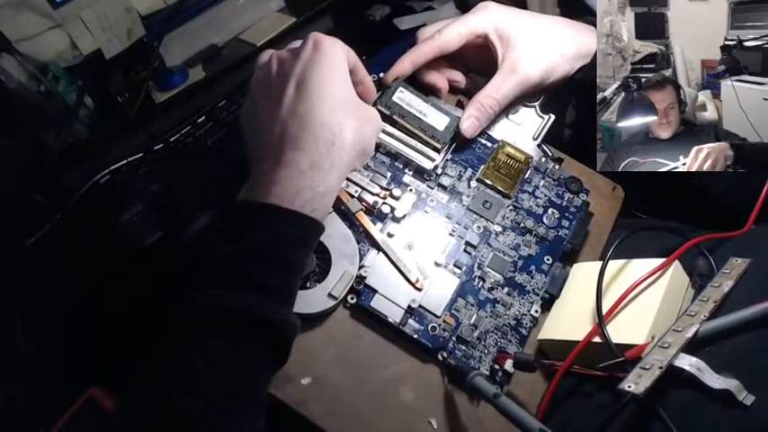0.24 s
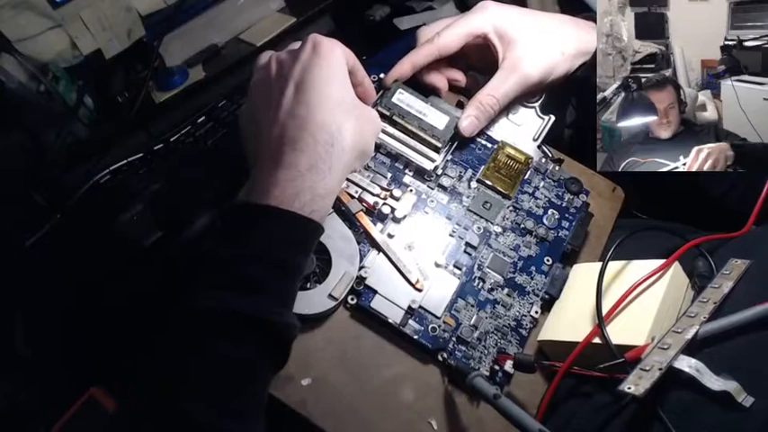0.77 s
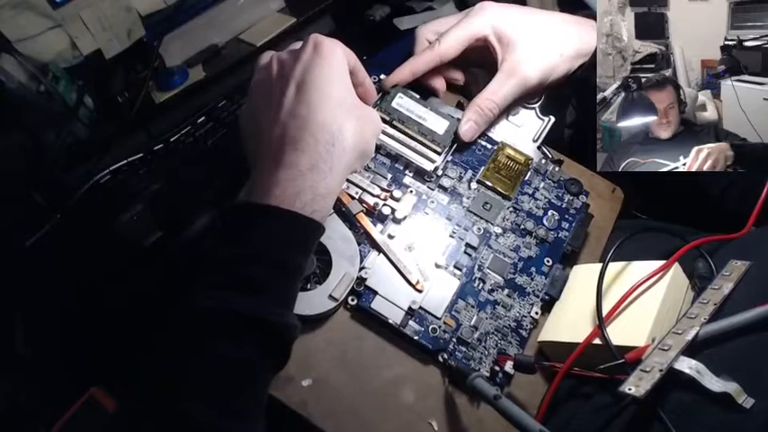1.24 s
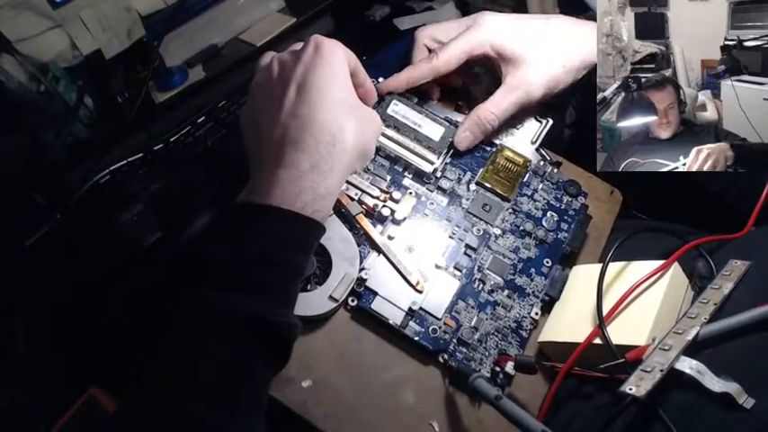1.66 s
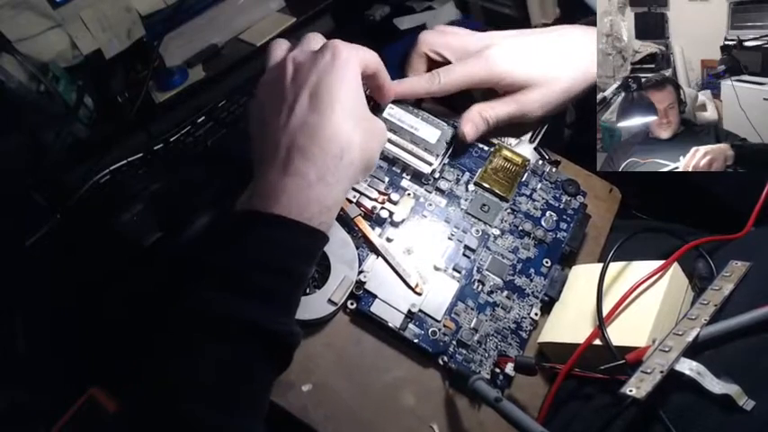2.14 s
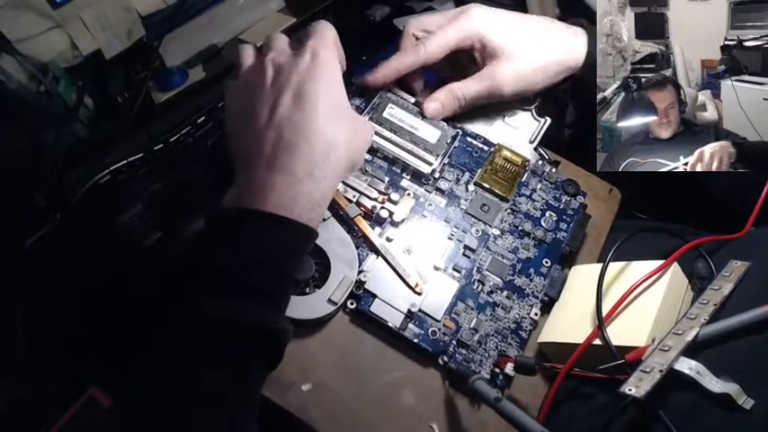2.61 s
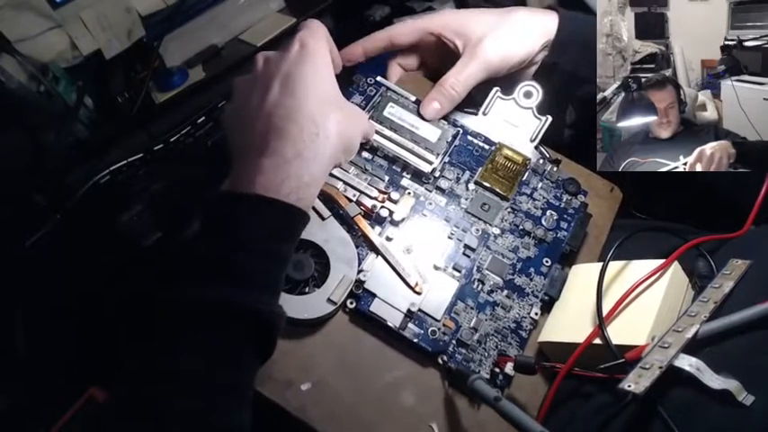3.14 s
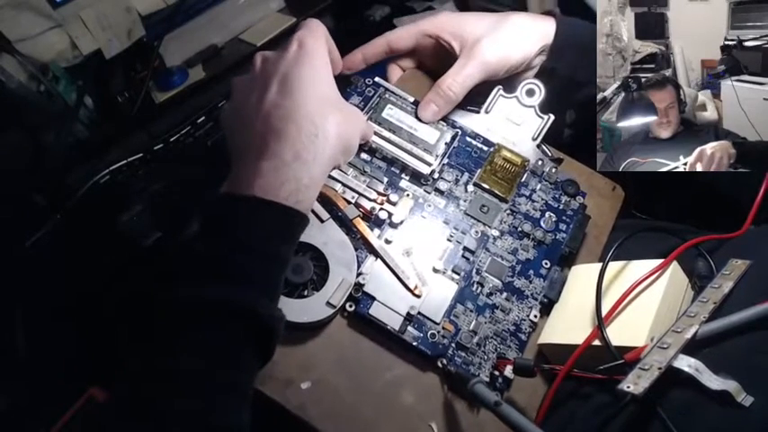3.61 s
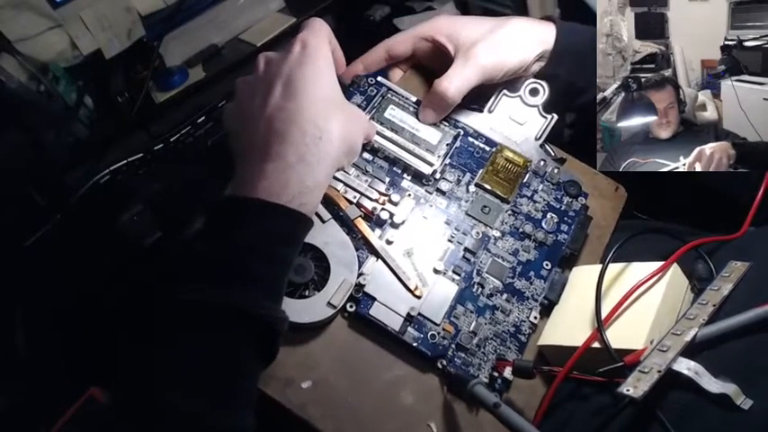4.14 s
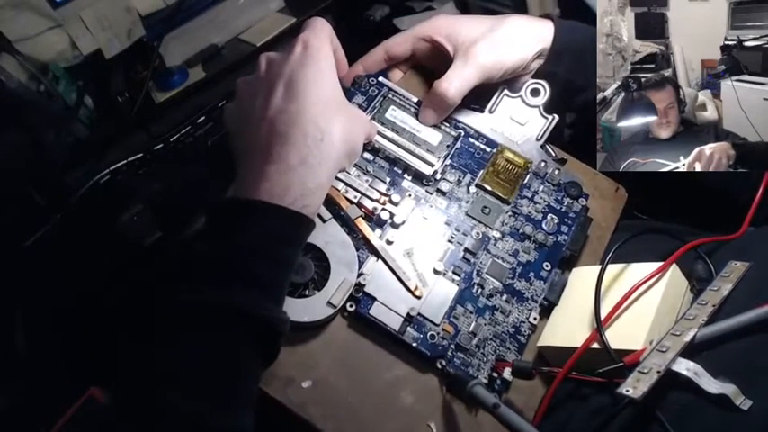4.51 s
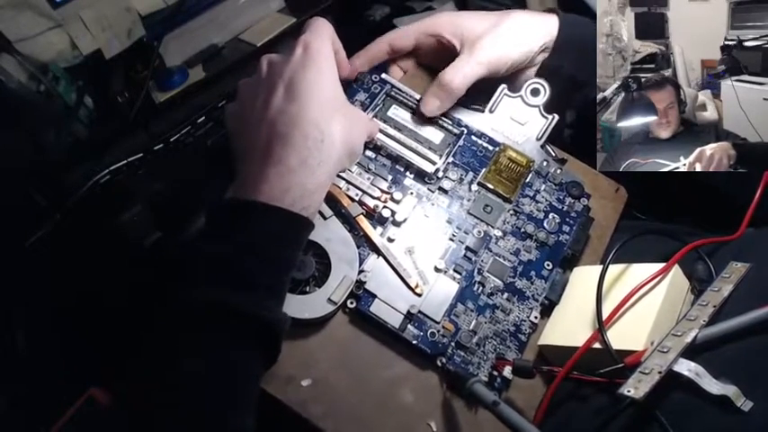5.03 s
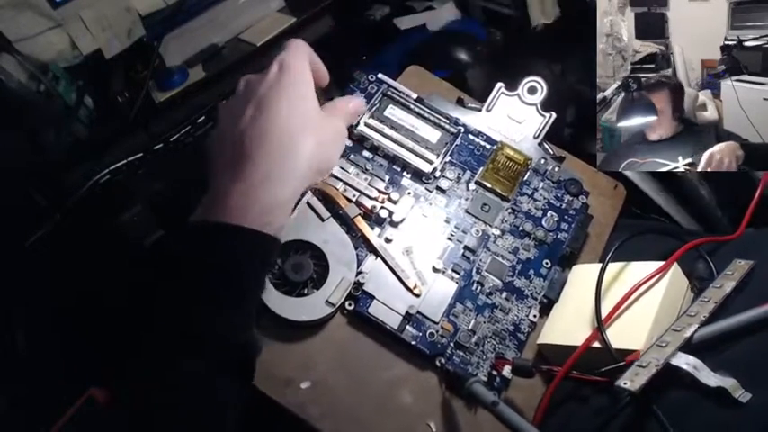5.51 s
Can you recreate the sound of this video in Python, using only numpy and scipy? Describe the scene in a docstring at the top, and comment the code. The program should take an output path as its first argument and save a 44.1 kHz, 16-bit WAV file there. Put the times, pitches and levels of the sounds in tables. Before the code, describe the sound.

Over mains hum, faint whine and soft fan hiss, a small circuit-board part creaks and snaps loudly into its clips, followed by soft knocks.

```python
"""A memory module is pushed into a laptop board: ticks, creaks against the spring clips, a snap home.
Contacts are gritty cracks plus decaying board modes; rubs and squeaks are band noise, bench bumps damped sines.
The microphone line picks up mains hum and a switching supply's whine, gated twice a mains cycle.
Fans hiss as band noise, arms rumble on the bench, and a small room adds a noisy tail to the handling."""
import sys
import numpy as np
from scipy import signal
from scipy.fft import rfft, irfft
from scipy.io import wavfile
from scipy.ndimage import uniform_filter1d, map_coordinates

SR = 44100
rng = np.random.default_rng(int(sys.argv[2]) if len(sys.argv) > 2 else 0)


def unload_audio(sound):
    """Save the sound as a 16-bit wav file, at the path given as the first command line argument."""
    columns = np.transpose(np.atleast_2d(sound))
    # keep every value between -1 and 1, then stretch to whole-number steps
    steps = np.round(np.clip(columns, -1, 1) * 32767)
    wavfile.write(sys.argv[1], SR, steps.astype(np.int16))


N = 254350
T = np.arange(N) / SR  # s


def undb(db):
    """Amplitude ratio of a level in dB."""
    return 10 ** (np.asarray(db) / 20)


def fade(t, t60):
    """Exponential decay, -60 dB at t60."""
    return np.exp(-np.log(1000) * t / t60)


def sine(hz, t):
    """Sine at hz, zero phase at t = 0."""
    return np.sin(2 * np.pi * hz * t)


def band(x, hz, width_hz):
    """Band-pass around hz."""
    edges_hz = np.clip([hz - width_hz / 2, hz + width_hz / 2], 5, .49 * SR)
    return signal.sosfilt(signal.butter(2, edges_hz, "band", fs=SR, output="sos"), x)


def noise(hz, width_hz):
    """Band noise of unit RMS."""
    x = band(rng.standard_normal(N), hz, width_hz)
    return x / x.std()


def walk(rate_hz):
    """Random values held 1 / rate_hz and slewed twice; spread near 1."""
    hold = int(SR / rate_hz)
    steps = np.repeat(rng.standard_normal(N // hold + 1), hold)
    return 1.3 * uniform_filter1d(uniform_filter1d(steps, hold), hold)[:N]


def add(out, start_s, x):
    """Mix x into out at start_s."""
    i = int(start_s * SR)
    out[i:i + len(x)] += x[:N - i]


# hum: mains multiple, level over pickup/dB, crest into the cycle/ms
HUM = [(1, 11.5, 10.9), (2, -2.5, .7)]
MAINS_HZ = 59.988


def hum():
    """Mains multiples, swaying together in level."""
    out = np.zeros(N)
    for multiple, db, crest_ms in HUM:
        turn = 2 * np.pi * multiple * MAINS_HZ * (T - crest_ms / 1000)
        out += np.sqrt(2) * undb(db) * np.cos(turn)
    return out * undb(1.1 * walk(15))


# rectifier bursts: middle into the cycle/ms, length/ms, switching multiples 1 to 3/dB (three columns),
# spike before a gain of 0.3/dB, fizz/dB; all levels over pickup
BURSTS = [(5.6, 4.77, 3.7, 12.5, 6.4, 12.5, 1.5), (14.5, 4.6, 2.5, -1.5, 2.5, 8, -6)]
SWITCH_HZ, SWITCH_SCATTER, SWITCH_SAG = 4790, .008, .035  # mid-burst rate; shares of it


def switching():
    """The supply switches only while its rectifier conducts, restarting each time."""
    out = np.zeros(N)
    cycle = (T * MAINS_HZ).astype(int)
    fizz = noise(12100, 6900)
    for middle_ms, length_ms, *multiples_db, spike_db, fizz_db in BURSTS:
        chance = rng.standard_normal((cycle[-1] + 1, 3))[cycle].T  # one draw a cycle
        t = T - cycle / MAINS_HZ - middle_ms / 1000 + 2e-5 * chance[0]
        u = np.clip(t * 2000 / length_ms, -1, 1)  # -1 to 1 across the burst
        gate = np.cos(np.pi * u / 2) ** 2 * undb(1.86 * chance[1])
        # the rate sags in the middle of the burst
        rate_hz = SWITCH_HZ * (1 + SWITCH_SCATTER * chance[2]) * (1 + SWITCH_SAG * u ** 2)
        for k, db in enumerate(multiples_db, 1):
            out += gate * undb(db) * sine(k * rate_hz, t)
        out += undb(fizz_db) * np.sqrt(gate) * fizz
        # spike as the diodes open
        out += .3 * undb(spike_db) * fizz * np.exp(-((u + 0.84) / 0.13) ** 2)
    return out


# line pickup of the mains, dropping while a hand shifts its grip: t/s, level/dB
PICKUP = [(0, -58), (1.4, -58.5), (2.5, -56), (4.36, -56), (4.43, -65.5), (4.72, -65.5), (4.82, -58.5)]


def mains():
    """Hum and switching whine scaled by the line pickup."""
    return undb(np.interp(T, *np.transpose(PICKUP))) * (hum() + switching())


# fan and room spectrum: f/Hz, relative density/dB per Hz
AIR = [(25, -7.5), (60, -24), (160, -21), (300, -18), (530, -25), (1000, -30), (2260, -27), (4100, -36.5),
       (7000, -38.5), (11000, -55), (16000, -47)]
# fan lines: f/Hz, width/Hz, level/dB
FAN_LINES = [(207.9, 13, -60), (1118, 12.3, -73), (1636, 15.5, -71), (2300, 66, -66.5)]
AIR_DB, TRANSFORMER_DB = -52.5, -58  # RMS: all bands together; sixth mains multiple


def air():
    """Third-octave bands that flicker a little, fan lines and an airborne transformer tone."""
    hiss = np.zeros(N)
    hz_at, db_at = np.transpose(AIR)
    for hz in 25 * 2 ** np.arange(0, 9.4, 1 / 3):
        density_db = np.interp(np.log(hz), np.log(hz_at), db_at)
        hiss += undb(density_db + 10 * np.log10(hz) + .7 * walk(8)) * noise(hz, hz / 4)
    tone = np.sqrt(2) * undb(TRANSFORMER_DB + .9 * walk(5)) * sine(6 * MAINS_HZ, T)
    lines = sum(undb(db) * noise(hz, width_hz) for hz, width_hz, db in FAN_LINES)
    return hiss * undb(AIR_DB) / hiss.std() + tone + lines


# arms on the bench: t/s, level/dB
RUMBLE = [(0, -63), (4.3, -66), (4.82, -49), (5.1, -51.5), (5.77, -54.5)]


def rumble():
    """Arms on the bench: wavering low band noise."""
    return undb(np.interp(T, *np.transpose(RUMBLE)) + 1.9 * walk(20)) * noise(52, 100)


# modes of module, clips and board: f/Hz, level/dB, t60/s
BOARD = [(711, -18.5, 0.074), (895, -30, 0.03), (1147, -19, 0.14), (1370, -12, 0.012), (1677, -4.5, 0.036),
         (1821, 3, 0.054), (2000, -9, 0.033), (2480, -8.5, 0.05), (2954, 0.5, 0.06), (3267, -2, 0.053),
         (3810, -6.5, 0.043), (4260, -3.5, 0.018), (4900, -3.5, 0.014), (5230, -6.5, 0.018),
         (5590, 4, 0.03), (6500, -13, 0.032), (7240, -1, 0.03), (7700, -2.5, 0.03), (8700, -3, 0.015),
         (9500, -8, 0.011), (11000, -8, 0.008), (12070, -2, 0.029), (13130, 1.5, 0.0064), (14100, -8, 0.01),
         (15600, -30, .014)]
# contact colour: lower edge, centre, upper edge; f/Hz
COLOUR_HZ = (1700, 5500, 12500)
CLIP_OCTAVES = .12  # width of the spring clips' modes around the centre


def blow(db, tilt_db, narrow_db, clip_db, scrape_ms, damping, scatter_db=1.5, crack_db=5):
    """A short gritty push cracks in the air and swells every board mode, damped by the fingers."""
    t, scrape_s = T[:SR // 8], scrape_ms / 1000
    low, centre, high = COLOUR_HZ

    def octaves(hz):
        return np.log2(np.clip(hz, low, high) / centre)

    def colour(hz):
        return undb(tilt_db * octaves(hz) - narrow_db * octaves(hz) ** 2)

    hz, mode_db, t60 = np.transpose(BOARD)[:, :, None]
    mode_db = mode_db + clip_db * np.exp(-(octaves(hz) / CLIP_OCTAVES) ** 2)
    chance = rng.standard_normal((3, len(BOARD), 1))  # level, pitch, phase
    # each mode flutters in level, and decays once the scrape length is over
    flutter = rng.standard_normal((len(BOARD), len(t)))
    uneven = 1 + 2.2 * uniform_filter1d(flutter, size=24, axis=1)
    decay = fade(np.maximum(t - scrape_s, 0), t60 * np.clip(damping, .1, 2))
    swell = uneven * np.minimum(t / 0.00033, 1) * decay
    phase = 2 * np.pi * (hz * (1 + 0.0087 * chance[1]) * t + chance[2])
    ring = undb(mode_db + scatter_db * chance[0]) * colour(hz) * swell * np.sin(phase)
    grit = rng.standard_normal(len(t)) * np.minimum(t / 0.00062, 1) * np.exp(-(t / scrape_s) ** 2)
    bins_hz = np.arange(len(t) + 1) * SR / len(t) / 2
    crack = irfft(rfft(grit, 2 * len(t)) * colour(bins_hz))[:len(t)]
    # so small a part radiates no bass
    return undb(db) * band(ring.sum(0) + undb(crack_db) * crack, 8340, 16020)


# blows on module and board: t/s, level/dB, brightness/dB per octave, narrowing/dB per octave squared,
# extra clip ring/dB, scrape length/ms, ring share of free decay
BLOWS = [(.246, -60, -6, -1, -4, 1.9, 0.28), (0.2535, -55, -3.5, 0, 2, 8, .3),
         (.471, -55, -5, 7, -5, 1.9, .3), (0.993, -52, 0, -1, -4, 8, .3),
         (.9995, -54, -10, -0.5, -4, 1.3, 0.41), (1.0045, -41.5, -8, 4, -6, 2.3, 0.32),
         (1.008, -58.5, -12.5, 0, -4, 2.7, .35), (1.700, -55.5, -9.5, 1.5, -4, 1.2, 0.59),
         (1.95, -57.5, -7.5, 3.5, -3, 3.4, .33), (1.979, -57.5, -10, 1, 6, 1.8, .24),
         (1.988, -59.5, -8, 2.5, -4, 7.4, .3), (2.562, -56, 1, 1, -1, 1.5, .3),
         (3.534, -42, -1, 2.5, 0, 3, 0.69), (3.543, -32, -0.5, 4, -3, 4.5, .66),
         (3.5465, -42, -5.5, 0.5, -3, 3, 1.4), (3.5514, -19, 6, 13, 6, 1.9, .2),
         (3.554, -26, 0.5, 2, 0, 1.7, 0.46), (3.5612, -31, -4.5, 0.5, 0, 1.3, 0.44),
         (3.5704, -15, 5.5, 0.5, -8, 1.6, 0.34), (3.5787, -17.5, 2.5, 2, 3, 2.54, .3),
         (3.597, -55, -3, 0.5, 0, 2.9, .39), (3.974, -42, 11, 4.5, 3.5, 1.15, 0.14),
         (4.165, -35, -12.5, 11.5, -0.5, 1.2, 0.44), (4.1675, -41.5, -8, 10.5, 4, 5.8, .4),
         (4.182, -61, -5, 1, -3, 4, .5), (4.5029, -63, -17.5, 2, 0, 1.2, .2),
         (4.844, -55, -3, 2, 3, 1.5, .26), (5.504, -59, -3, 3, 1, 2.3, .28)]


def blows():
    """Single contacts of module and board, up to the snap and after it."""
    out = np.zeros(N)
    for start_s, *contact in BLOWS:
        add(out, start_s, blow(*contact))
    return out


# fingers sliding on the board: t/s, length/s, final level/dB, swell/dB per s
RUBS = [(1.815, 0.21, -58.5, 26), (3.4, .14, -46, 102), (4.24, 0.067, -60, 5)]
RUB_EDGE_S = 0.036


def rubs():
    """Sliding fingers: band noise that swells and wavers."""
    out = np.zeros(N)
    for start_s, length_s, db, swell_db_per_s in RUBS:
        end_s = start_s + length_s
        touch = np.clip(np.minimum(T - start_s, end_s - T) / RUB_EDGE_S + 1, 0, 1)
        level_db = db + swell_db_per_s * np.minimum(T - end_s, 0) + 1.3 * walk(150)
        out += touch * undb(level_db) * noise(3960, 3600)
    return out


# runs of slips of the module edge along the clips: t/s, slips, rate/slips per s
CREAKS = [(3.248, 7, 80), (3.357, 1, 80), (3.378, 9, 95), (3.470, 7, 220), (3.507, 3, 91)]
# contact of every slip: as the BLOWS columns after the level
SLIP = (-2, 7.5, -6, 1.05, 0.18)
SLIP_JITTER, SLIP_DB, SLIP_GROWTH_DB_PER_S = .08, -52.5, 43.5  # share of a gap; start of first run; growth
NOTCH_HZ, NOTCH_RISE_HZ_PER_S, ECHO_SHARE = 3150, 3000, .6


def creaks():
    """The module edge sticks and slips along the clips in uneven runs, louder as the push grows."""
    out = np.zeros(N)
    for start_s, count, rate_hz in CREAKS:
        jitter = SLIP_JITTER * rng.standard_normal(count)
        for slip_s in start_s + (np.arange(count) + jitter) / rate_hz:
            pushed_s = slip_s - CREAKS[0][0]
            slip = blow(SLIP_DB + SLIP_GROWTH_DB_PER_S * pushed_s, *SLIP)
            # inverted board echo weakens multiples of a pitch that rises as the module sinks
            delay_samples = SR / (NOTCH_HZ + NOTCH_RISE_HZ_PER_S * pushed_s)
            echo = map_coordinates(slip, [np.arange(len(slip)) - delay_samples])
            add(out, slip_s, slip - ECHO_SHARE * echo)
    return out


# dull bumps on the bench: t/s, level/dB, ring f/Hz, t60/s
BUMPS = [(4.5043, -26, 548, 0.055), (4.910, -39, 250, .05), (4.978, -35.5, 268, 0.083),
         (5.042, -36, 211, 0.047), (5.096, -35, 233, 0.041), (5.277, -21, 198, 0.042)]


def bumps():
    """The bench top gives one ring, a stiffer overtone and a slow sway."""
    out = np.zeros(N)
    t = T[:SR // 5]
    for start_s, db, hz, t60 in BUMPS:
        push = np.minimum(t * hz * 2, 1)  # a soft blow takes half a ring to land
        ring = sine(hz, t) * fade(t, t60)
        overtone = 0.64 * sine(2.1 * hz, t) * fade(t, 0.2 * t60)
        sway = 0.22 * sine(45, t) * fade(t, 0.11)
        add(out, start_s, -undb(db) * push * (ring + overtone + sway))
    return out


# faint squeaks: t/s, length/s, f/Hz, level/dB
SQUEAKS = [(4.97, 0.21, 590, -56), (5.572, 0.068, 556, -58)]


def squeaks():
    """Narrow-band noise under half-sine swells."""
    out = np.zeros(N)
    for start_s, length_s, hz, db in SQUEAKS:
        swell = np.sin(np.pi * np.clip((T - start_s) / length_s, 0, 1))
        out += undb(db) * swell * noise(hz, 43)
    return out


# room tail: f/Hz, relative level/dB, t60/s
ROOM = [(690, -17, 0.14), (1900, -14.5, 0.1), (2970, -11.5, 0.18), (5400, -20, 0.098), (9000, -17, 0.22),
        (13000, -7, 0.12)]


def room(dry):
    """A short noisy tail, each band with its own decay."""
    t = T[:SR // 3]
    tail = np.zeros(len(t))
    for hz, db, t60 in ROOM:
        hiss = band(rng.standard_normal(len(t)), hz, hz)
        tail += undb(db) * hiss * fade(t, t60) / np.sqrt(hz * t60)
    return signal.fftconvolve(dry, tail * np.minimum(t / 0.0015, 1))[:N]


def scene():
    """Handling with its room tail, over rumble, line pickup and air."""
    hands = creaks() + blows() + rubs() + bumps() + squeaks()
    bench = rumble()
    return (hands + room(hands) + mains() + bench + air())[None]


TOP_HZ = 15900


def record(dry):
    """The loudest peaks are rounded and the top is cut."""
    rounded = np.tanh(dry / 0.94) * 0.82
    return signal.sosfilt(signal.ellip(10, .2, 80, TOP_HZ, fs=SR, output="sos"), rounded)


dry = scene()
out = record(dry)
unload_audio(out)
```